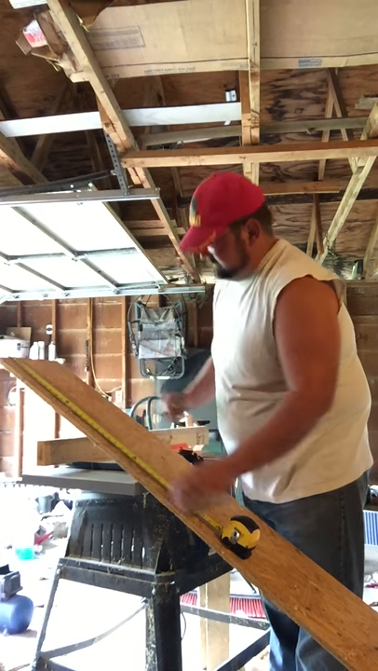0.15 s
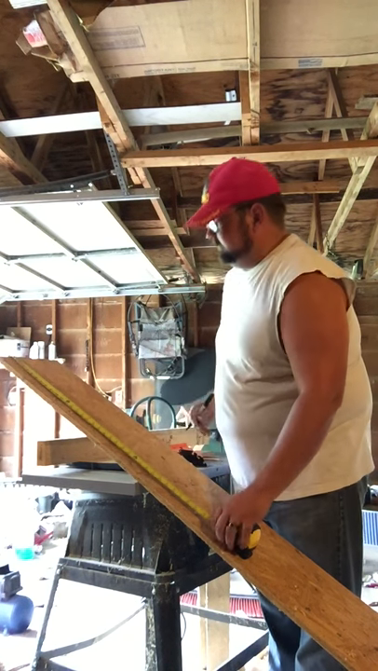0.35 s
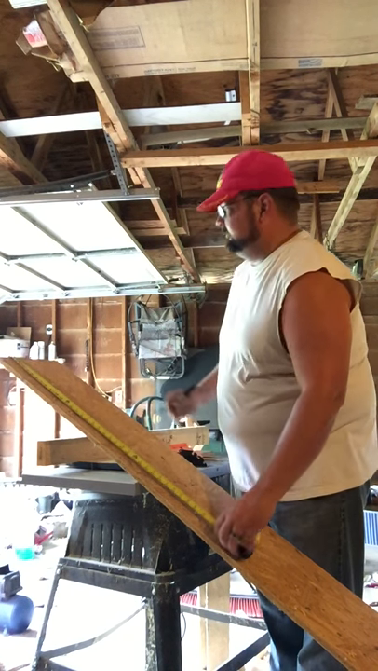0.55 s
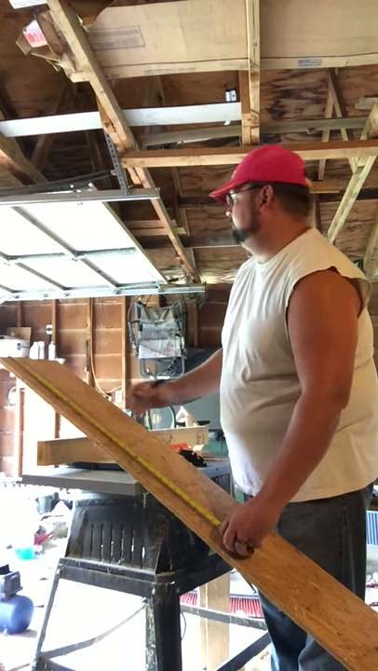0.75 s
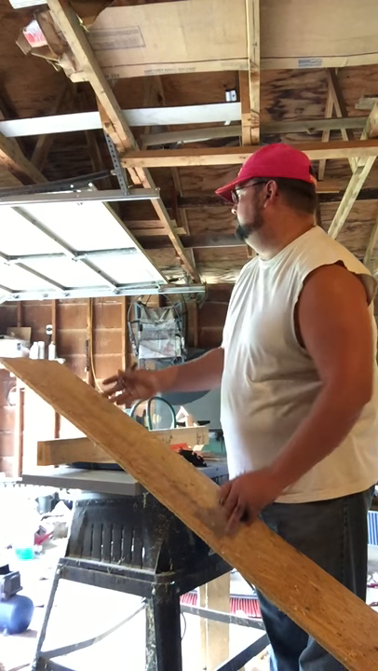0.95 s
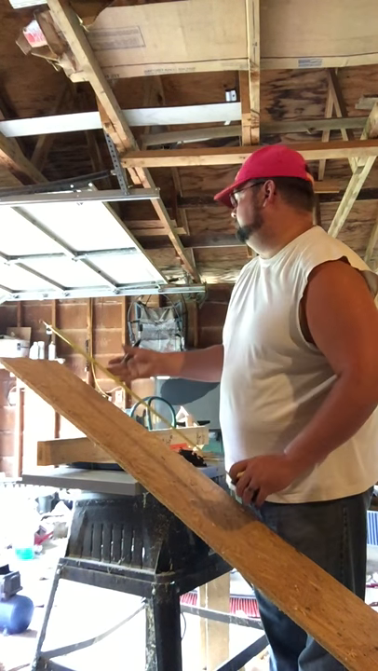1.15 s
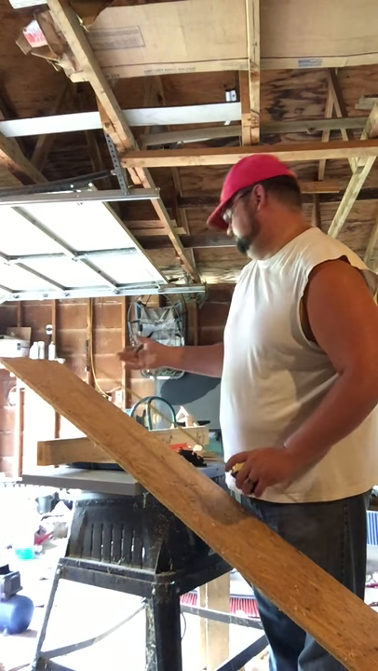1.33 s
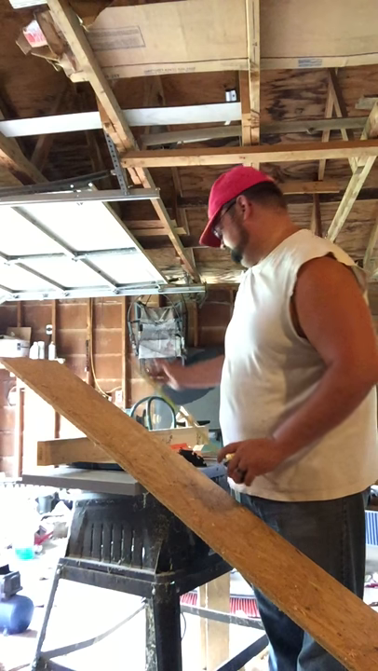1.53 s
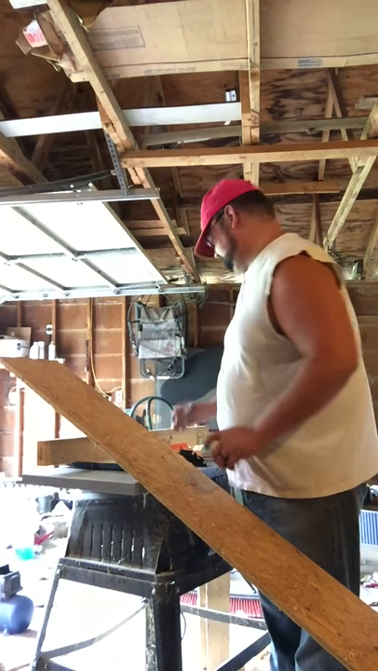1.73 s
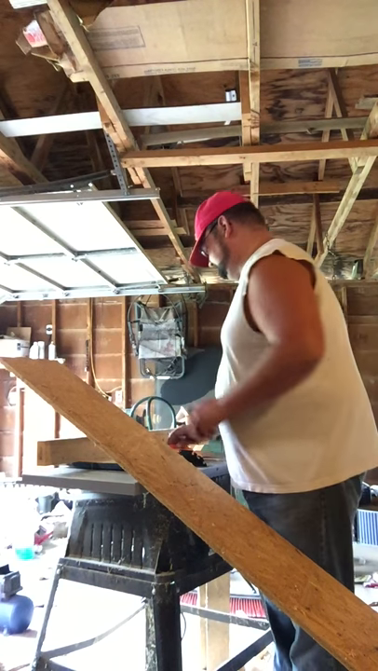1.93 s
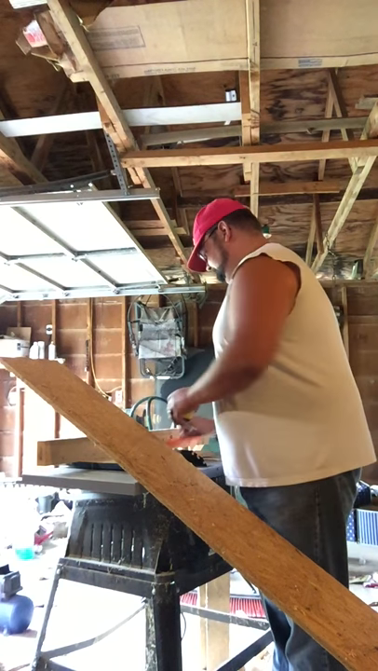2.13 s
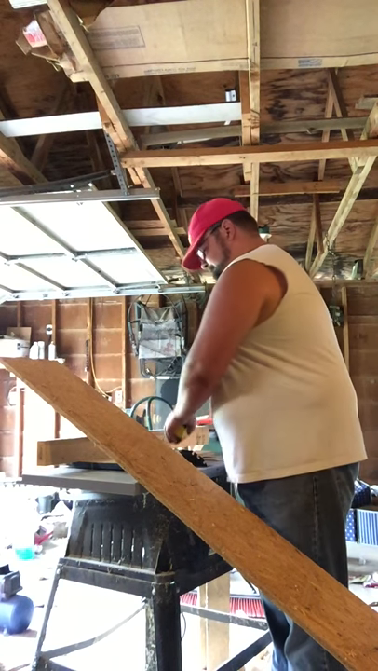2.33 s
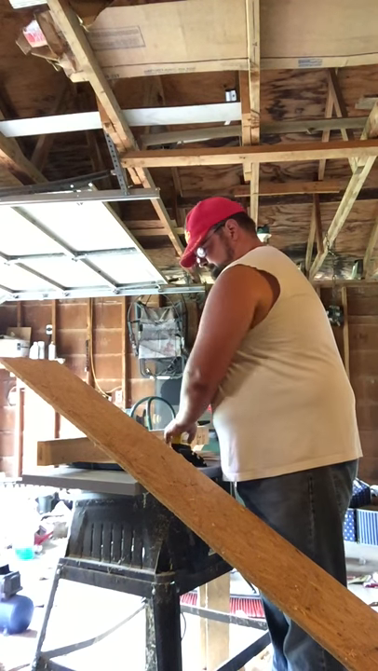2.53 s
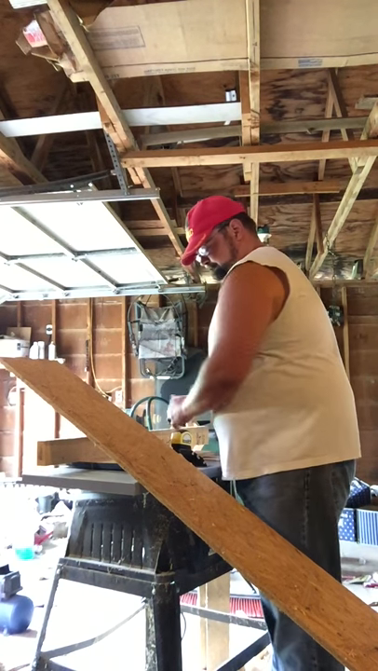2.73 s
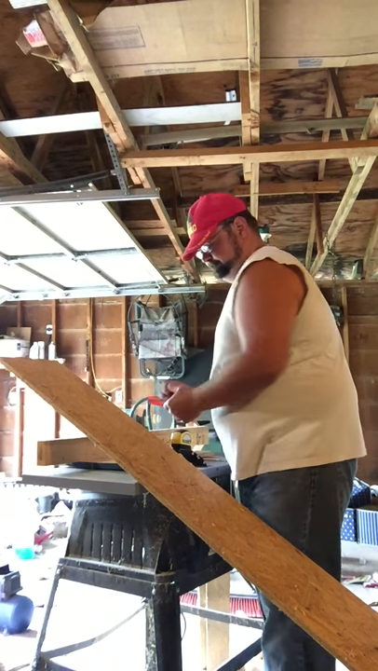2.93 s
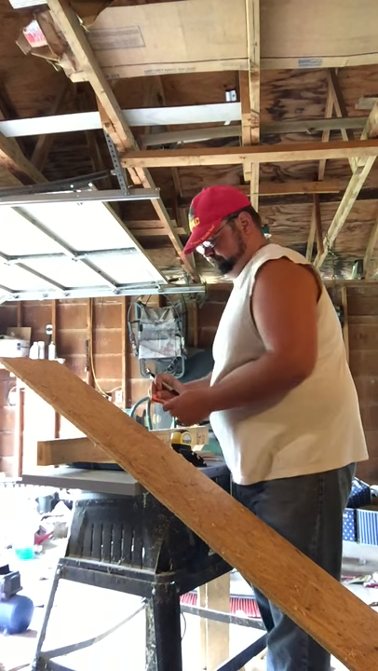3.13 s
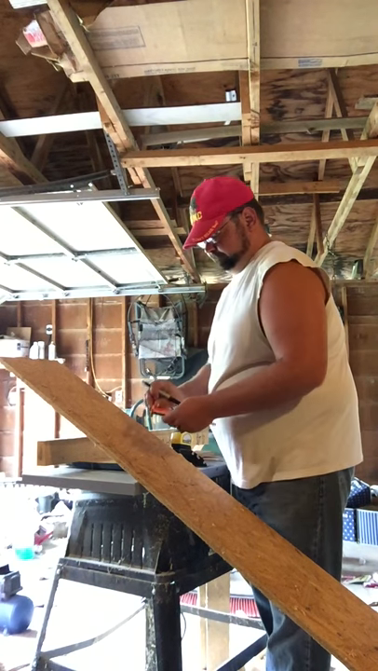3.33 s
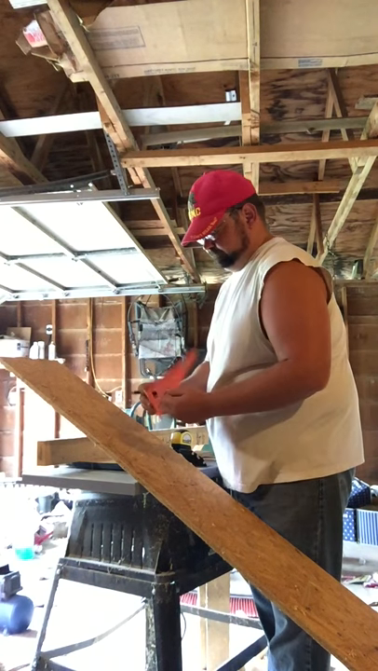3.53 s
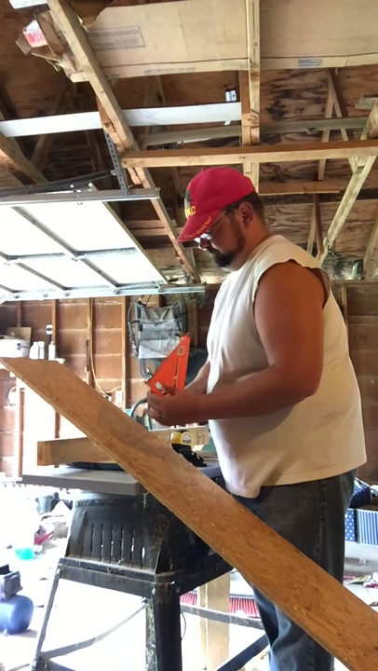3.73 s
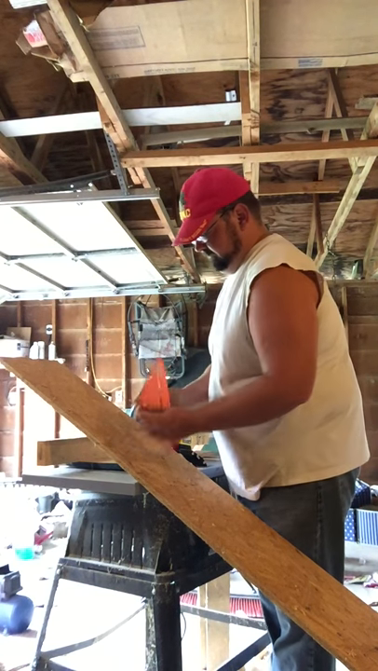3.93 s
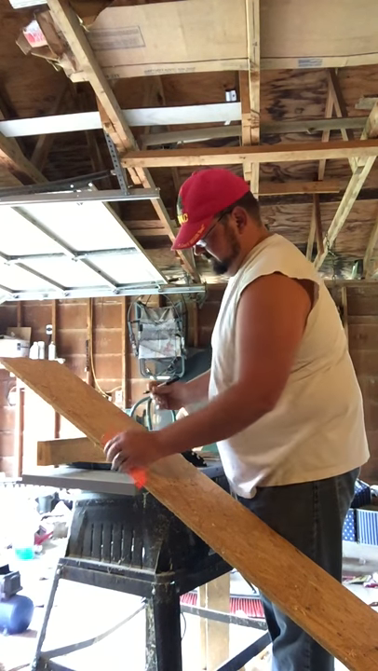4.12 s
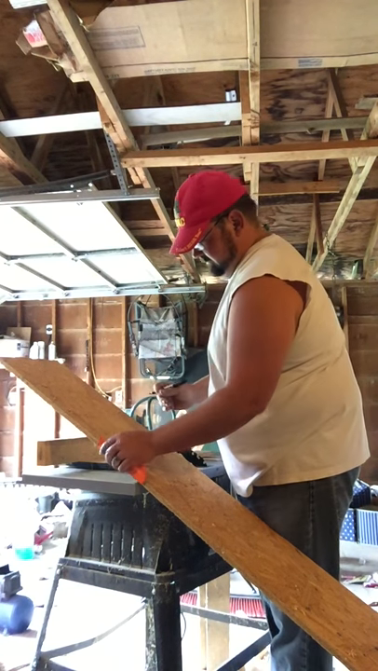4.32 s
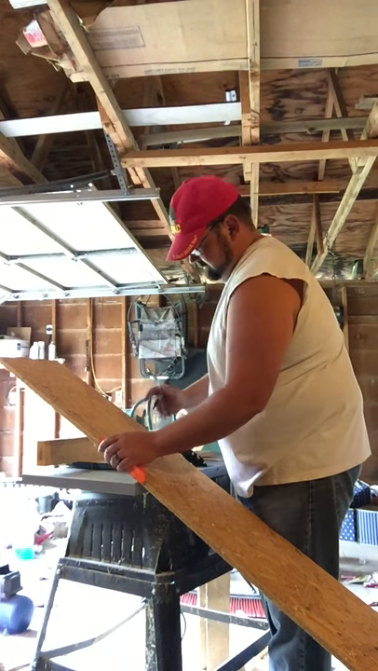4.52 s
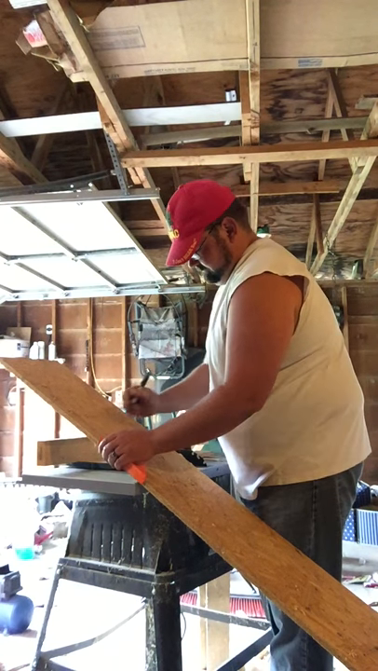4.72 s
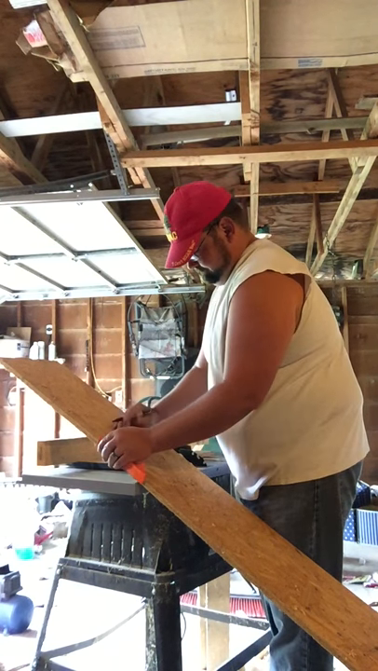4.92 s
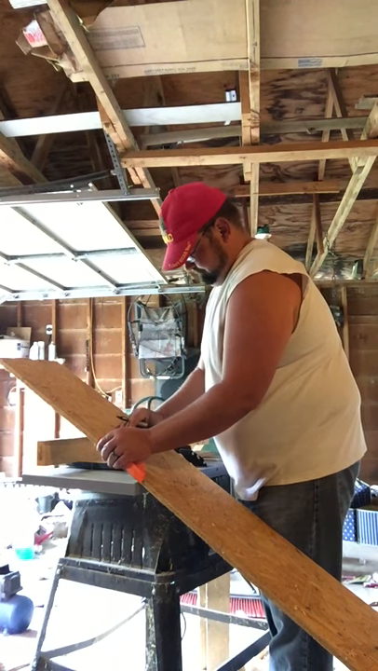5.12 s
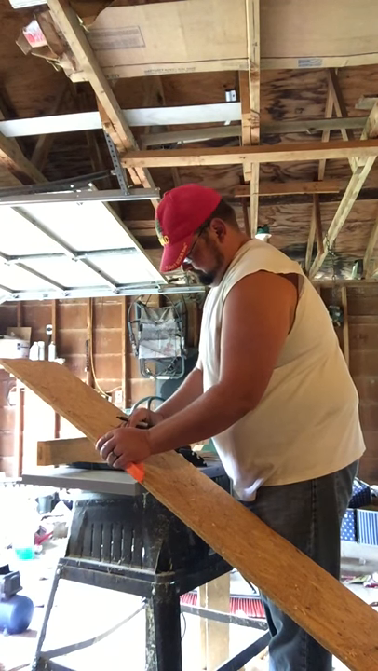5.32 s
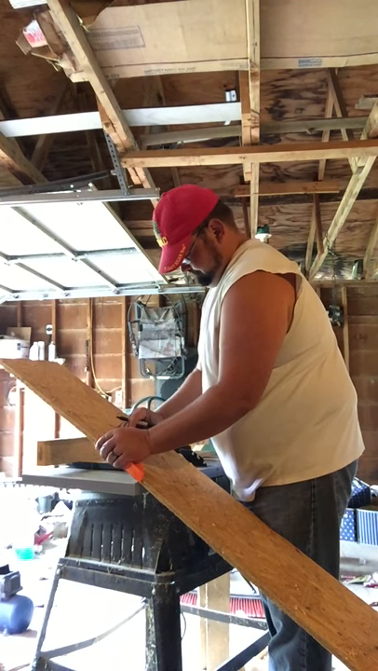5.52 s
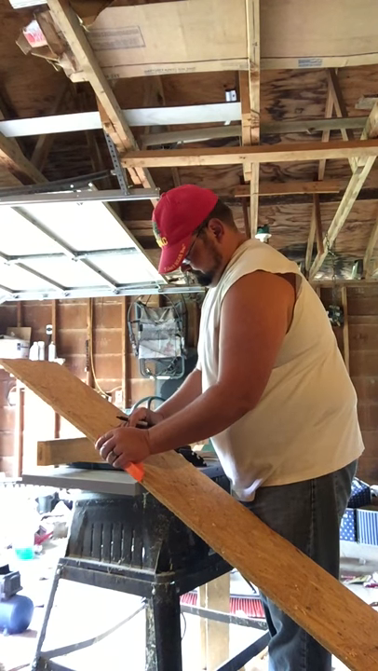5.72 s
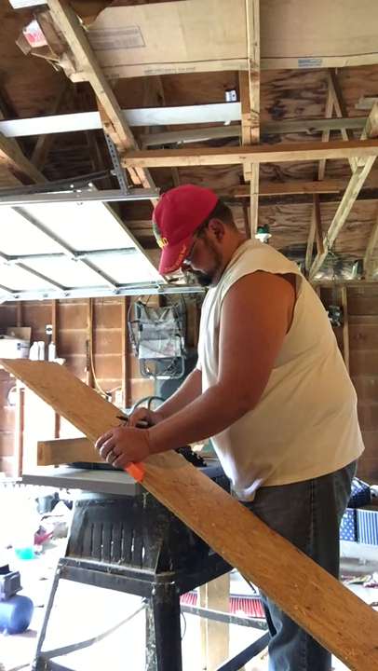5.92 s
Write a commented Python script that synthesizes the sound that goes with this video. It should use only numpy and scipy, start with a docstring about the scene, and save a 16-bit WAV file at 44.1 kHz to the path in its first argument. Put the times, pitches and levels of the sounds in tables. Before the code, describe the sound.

In a quiet timber garage, a tape measure's lock clicks and the thin steel blade hisses in, speeding into a rattle that ends with a sharp snap. The case is put down on a saw table with a clack and thump. After a few light finger taps, a plastic square claps against a long board, which rocks briefly. Each sound has a short room echo, over a faint high hiss and low drone.

```python
"""A steel tape measure is unlocked in a timber garage: its spring pulls the blade in faster and faster,
the spool chatters and the hook snaps against the case. The case is put down on a saw table, then a
plastic square is picked up and clapped against a long board. Each knock is a short push that makes an
object ring; each scrape is thousands of tiny slips. Both echo in the room.
Under it all lie a thin high hiss and a faint low drone, like a distant motor."""
import sys
import numpy as np
from scipy import signal
from scipy.fft import rfft, irfft, next_fast_len
from scipy.io import wavfile
from scipy.ndimage import uniform_filter1d, map_coordinates

SR = 44100
rng = np.random.default_rng(int(sys.argv[2]) if len(sys.argv) > 2 else 0)


def dump_mix(stems):
    """Bounce the given channels to the path in sys.argv[1] as a 16-bit WAV at rate SR."""
    frames = np.atleast_2d(stems).T  # one column per channel
    limited = np.clip(frames, -1, 1)  # hard clip at full scale
    pcm = np.round(limited * 32767).astype(np.int16)
    wavfile.write(sys.argv[1], SR, pcm)


N = 267290


def amp(db):
    """Turn decibels into a number to multiply by."""
    return 10 ** (np.asarray(db) / 20)


def unit(x):
    """Scale a sound so that its average strength (rms) is 1."""
    return x / np.sqrt(np.mean(x ** 2) + 1e-20)


def read_curve(points, hz):
    """Read between (frequency, value) points, with the frequencies spaced by octaves."""
    freqs, values = np.transpose(points)
    return np.interp(np.log(hz + 1), np.log(freqs + 1), values)


def wobble(rate):
    """A smooth random curve that passes through `rate` new values a second."""
    values = rng.standard_normal(int(N * rate / SR) + 4)
    return map_coordinates(values, [np.arange(N) * rate / SR])


def swells(rows, rise_db_per_s, fall_db_per_s):
    """Loudness over time: each row rises to its level by its start time, holds it and dies away."""
    t = np.arange(N) / SR
    gain = np.zeros(N)
    for start_s, hold_s, db in rows:
        before = np.maximum(start_s - t, 0)
        after = np.maximum(t - start_s - hold_s, 0)
        gain += amp(db - rise_db_per_s * before - fall_db_per_s * after)
    return gain


def ringing(body, size=16384):
    """How an object rings after one tap. A body is two lists: its broad tone and its ringing peaks."""
    tone, peaks = body
    hz = np.fft.rfftfreq(size, 1 / SR)
    boost = sum((amp(2 * db) - 1) / (1 + (2 * (hz - f) / width) ** 2) for f, width, db in peaks)
    spectrum = amp(read_curve(tone, hz)) * np.sqrt(np.abs(1 + boost))
    # keep this spectrum, but make all the ringing come after the tap
    cepstrum = irfft(np.log(spectrum))
    cepstrum[1:size // 2] *= 2
    cepstrum[size // 2 + 1:] = 0
    ring = irfft(np.exp(rfft(cepstrum)))[:size // 2]
    return ring / np.linalg.norm(ring)


# How long the room's echo lasts: f/Hz, time to fade by 60 dB/s
ECHO_TIMES = [(100, 0.43), (300, .53), (700, 0.39), (1500, .38), (3000, 0.32), (6000, 0.34), (13000, .22)]

def garage(x, echo_db, early_db=-7, early_s=.014, build_s=.009):
    """Add quick echoes off the bench, then a tail from the rafters whose high notes die sooner."""
    hz, times, noise = signal.stft(rng.standard_normal(SR * 3 // 4), SR, nperseg=256)
    fade = amp(-60 * times / read_curve(ECHO_TIMES, hz)[:, None])
    tail = signal.istft(noise * fade, SR, nperseg=256)[1]
    t = np.arange(len(tail)) / SR
    tail *= 1 - np.exp(-(t / build_s) ** 2)
    early = rng.standard_normal(len(t)) ** 3 * t * np.exp(-(2 * t / early_s) ** 2)
    echoes = amp(echo_db) * tail / np.linalg.norm(tail) + amp(early_db) * early / np.linalg.norm(early)
    echoes[0] = 1  # the sound that arrives directly
    return signal.fftconvolve(x, echoes)


def knocks(rows, body, push_db, buzz_s, echo_db):
    """Each knock is a push and a brief buzz of the touching faces, ringing in the object and the room."""
    out = np.zeros(N + 2 * SR)
    ring = ringing(body)
    t = np.arange(SR // 20) / SR
    fade = amp(-60 * t / buzz_s)
    for start_s, db, cutoff_hz in rows:
        buzz = rfft(rng.standard_normal(len(t)) * fade)
        force = irfft(buzz / np.abs(buzz), len(t)) * np.sqrt(fade)  # reaches all pitches evenly
        force[0] += amp(push_db)
        # a soft knock has a low cutoff and sounds dull; a hard one has a high cutoff
        force = signal.lfilter([1], [1, -np.exp(-2 * np.pi * cutoff_hz / SR)], force)
        hit = signal.fftconvolve(force, ring)
        hit *= np.sqrt(SR / 200 / np.sum(hit ** 2))  # as much energy as 5 ms at strength 1
        hit = garage(hit, echo_db)
        out[round(start_s * SR):][:len(hit)] += amp(db) * hit
    return out[:N]


def moving_contact(x, depth_db):
    """As the point of touch moves, it brings out different pitches at random."""
    spectrum = signal.stft(x, nperseg=1024)[2]
    patches = uniform_filter1d(rng.standard_normal(spectrum.shape), size=7, axis=0)  # smooth in pitch
    patches = uniform_filter1d(patches, size=4, axis=1)  # and in time
    return signal.istft(spectrum * amp(depth_db * unit(patches)), nperseg=1024)[1][:N]


def rub(gain, body, slips_per_s, surge_db, echo_db, patchy_db=3):
    """Rubbing is many tiny random slips, in uneven surges, ringing in the object and the room."""
    slips = (rng.random(N) < slips_per_s / SR) * rng.uniform(-0.75, 1, N)
    slips *= amp(surge_db * wobble(70))
    rung = signal.fftconvolve(slips, ringing(body))[:N]
    scrape = unit(moving_contact(rung, patchy_db))
    return garage(scrape * gain, echo_db)[:N] / np.hypot(1, amp(echo_db))


# Broad tone of the still air: f/Hz, level/dB
AIR_TONE = [(20, -22), (42, -1.5), (100, 2.5), (260, -3), (500, -11), (1400, -10.5), (2500, -12.5),
            (4700, -19), (5050, -23.5), (7400, -21), (9500, -26), (10400, -30.5), (11500, -25),
            (16000, -30.5)]
# Bands of high hiss that stand out of it: f/Hz, width/Hz, height/dB
HISS_PEAKS = [(6020, 430, 12.5), (7350, 490, 16.5)]

def still_air(level_db=-66.5):
    """Soft steady noise with a thin high hiss."""
    noise = signal.fftconvolve(rng.standard_normal(N + SR), ringing((AIR_TONE, HISS_PEAKS)))
    return amp(level_db) * unit(noise[SR:SR + N])


def hum(hz, waver_hz, flutter_db):
    """One tone whose pitch and loudness waver."""
    phase = 2 * np.pi * np.cumsum(hz + waver_hz * wobble(31)) / SR
    return unit(np.sin(phase) * amp(flutter_db * wobble(18)))


# When the drone's lower and upper tones swell: t/s, hold/s, level/dB
LOW_HUM_SWELL = [(5.95, .2, -63)]
UPPER_HUM_SWELL = [(4.15, 0.8, -71.5)]

def far_drone(low_rest_db=-77.5, upper_rest_db=-87):
    """Two faint low tones, like a distant motor, that swell late in the scene."""
    low_gain = np.hypot(amp(low_rest_db), swells(LOW_HUM_SWELL, rise_db_per_s=26, fall_db_per_s=27))
    upper_swell = swells(UPPER_HUM_SWELL, rise_db_per_s=19, fall_db_per_s=20.5)
    upper_gain = np.hypot(amp(upper_rest_db), upper_swell)
    low = low_gain * hum(hz=93, waver_hz=2.6, flutter_db=3)
    upper = upper_gain * hum(hz=161.5, waver_hz=0.68, flutter_db=2)
    return low + upper


# Light taps of fingers and tools, and at 2.594 s the saw table rings once more after the case lands: t/s,
# level/dB, cutoff/Hz, ringing pitch/Hz
LIGHT_TAPS = [(2.297, -63, 2990, 2296), (2.594, -33.5, 201, 986), (3.113, -57, 400, 1374),
              (3.59, -60, 3000, 2280), (3.676, -63, 3000, 2280), (3.872, -62, 16000, 12600),
              (3.884, -61, 1500, 1530), (4.103, -57.5, 5900, 1960)]
# Broad tone that these taps share: f/Hz, level/dB
TAP_TONE = [(25, -44), (200, -16.5), (480, -6), (800, -9.5), (1500, -6), (2300, -4), (3500, -9.5),
            (5500, -13.5), (9000, -26), (13000, -15.5)]

def light_taps():
    """Fingers and tools touch lightly, and the saw table rings once more after the case; each tap rings at its
    own pitch."""
    out = np.zeros(N)
    for start_s, db, cutoff_hz, ring_hz in LIGHT_TAPS:
        body = (TAP_TONE, [(ring_hz, ring_hz / 25, 14)])  # one narrow peak, 14 dB high
        out += knocks([(start_s, db, cutoff_hz)], body, push_db=-20, buzz_s=0.027, echo_db=-2.5)
    return out


# Hand and case slide over the wood: t/s, hold/s, level/dB
WOOD_SLIDES = [(.41, 0.045, -64), (.81, 0.013, -60.5), (.93, .035, -60)]
# Rubbed wood: tone (f/Hz, level/dB) and peaks (f/Hz, width/Hz, height/dB)
WOOD_RING = ([(25, -9), (110, 4.5), (300, -3), (600, -9), (1200, -9), (2200, -4), (5000, -13.5),
             (12000, -28.5)], [(163, 36, 2.2), (1880, 160, 3.3)])

def wood_slide():
    """The hand and the tape's case rub softly over the wood."""
    gain = swells(WOOD_SLIDES, rise_db_per_s=220, fall_db_per_s=145)
    return rub(gain, WOOD_RING, slips_per_s=6200, surge_db=2, echo_db=-4.5)


# The square is laid on and the board rocks: t/s, level/dB, cutoff/Hz
SQUARE_KNOCKS = [(4.2132, -22.5, 5500), (4.2165, -30, 2500), (4.2275, -34.5, 3500), (4.2855, -34.5, 2500),
                 (4.397, -37, 2960)]
BOARD_KNOCKS = [(4.215, -34.5, 1500), (4.283, -28, 1500), (4.293, -30.5, 1790), (4.299, -32.5, 1170),
                (4.317, -35, 250), (4.335, -36.5, 250), (4.399, -35.5, 1520), (4.44, -44, 910)]
# The square's lip skids along the board's edge: t/s, hold/s, level/dB
LIP_SKIDS = [(4.355, 0.0085, -47.5)]
# Square, board and lip: tone (f/Hz, level/dB) and peaks (f/Hz, width/Hz, height/dB)
SQUARE_RING = ([(25, -39), (100, -29), (220, -36), (400, -10.5), (900, -15.5), (1200, -6.5), (1950, -17.5),
               (3000, -8.5), (4000, -7.5), (5200, -14), (8000, -14.5), (11000, -26.5), (15000, -33.5)],
               [(1092, 30, 17.4), (1120, 29, 9.4), (1600, 39, 14), (1663, 59, 24), (2280, 120, 17.7),
               (2931, 78, 11.2), (3600, 210, 9), (4060, 50, 6.3)])
BOARD_RING = ([(25, -65), (70, -33), (115, -18.5), (170, -20), (240, -6.5), (350, -3.5), (600, -9),
              (1300, -11.5), (2500, -11.5), (5000, -45), (12000, -44.5)], [(314, 8.2, 7.1),
              (376.7, 8.8, 8.7), (515.5, 20, 12.5), (688, 13, 10.7), (858, 14, 5.4), (1207, 71, 7.4),
              (1680, 13, 4.6)])
LIP_RING = ([(25, -43), (1000, -1), (3000, 0.5), (6000, -1.5), (8500, -1), (11000, -11.5), (16000, -15)],
            [(7800, 490, 2.2)])

def square_on_board():
    """The plastic square claps on the board and skids into place; the board rocks on its support."""
    clap = knocks(SQUARE_KNOCKS, SQUARE_RING, push_db=-11.5, buzz_s=0.0263, echo_db=-6.5)
    thud = knocks(BOARD_KNOCKS, BOARD_RING, push_db=-19.5, buzz_s=0.062, echo_db=-1)
    skid_gain = swells(LIP_SKIDS, rise_db_per_s=1800, fall_db_per_s=430)
    skid = rub(skid_gain, LIP_RING, slips_per_s=6000, surge_db=0.5, echo_db=-8)
    return clap + thud + skid


# The case lands and the saw table takes its weight: t/s, level/dB, cutoff/Hz
CASE_KNOCKS = [(2.519, -36, 1400), (2.5237, -27.5, 1712), (2.5355, -19.5, 3488)]
TABLE_KNOCKS = [(2.5372, -20.5, 2513), (2.5435, -25.5, 1500)]
# Case and table: tone (f/Hz, level/dB) and peaks (f/Hz, width/Hz, height/dB)
CASE_RING = ([(25, -44.5), (100, -20.5), (500, -12), (1000, -7), (1550, -6), (2200, -3), (3000, -8.5),
             (4400, -13.5), (5200, -18.5), (9000, -25.5), (15000, -31.5)], [(1310, 70, 10), (1556, 90, 4.8),
             (1740, 45, 3.9), (2058, 280, 6), (2500, 26, 5), (3000, 90, 2.9)])
TABLE_RING = ([(25, -50), (85, -30), (130, -7.5), (200, -5), (280, -16), (450, -3), (700, -5), (900, -1.5),
              (1300, -5.5), (3000, -20), (9000, -33)], [(134, 17, 5.1), (190, 4.7, 4.8), (207.7, 18, 7),
              (494.3, 13, 6.5), (710, 42, 11), (907, 25, 5.3), (993, 30, 7.1)])

def case_on_table():
    """The case touches with one edge, then falls flat and thumps the table."""
    clack = knocks(CASE_KNOCKS, CASE_RING, push_db=-18.5, buzz_s=0.064, echo_db=-5)
    thump = knocks(TABLE_KNOCKS, TABLE_RING, push_db=-13, buzz_s=.03, echo_db=-5)
    return clack + thump


# Squeezes of the hand: t/s, hold/s, level/dB
GRIP_CREAKS = [(2.075, 0.017, -52), (2.15, .03, -56)]
# The gripped case: tone (f/Hz, level/dB) and peaks (f/Hz, width/Hz, height/dB)
GRIP_RING = ([(25, -23.5), (80, -15), (200, -0.5), (450, -9), (850, -0.5), (1600, -8.5), (3300, -11.5),
             (5000, -18.5), (12000, -31)], [(891, 83, 6.7), (1020, 60, 5), (2250, 58, 17),
             (3330, 150, 3.3)])

def grip_creak():
    """The case creaks as the hand closes on it."""
    gain = swells(GRIP_CREAKS, rise_db_per_s=600, fall_db_per_s=254)
    return rub(gain, GRIP_RING, slips_per_s=7500, surge_db=3.5, echo_db=-12)


# Clicks of the thumb lock: t/s, level/dB, cutoff/Hz
LOCK_CLICKS = [(1.1215, -52, 7000), (1.1250, -28.5, 8940), (1.1285, -38.5, 5000), (1.134, -39, 5985)]
# The lock: tone (f/Hz, level/dB) and peaks (f/Hz, width/Hz, height/dB)
LOCK_RING = ([(25, -39), (120, -19), (230, -8), (500, -13.5), (1000, -1), (1650, -4.5), (1900, -14),
             (2500, -4.5), (4000, -4.5), (5000, -11.5), (7500, -11), (10500, -23.5), (14000, -16)],
             [(924, 50, 6.5), (1300, 50, 10.5), (1600, 90, 11), (2588, 36, 13), (3976, 170, 5.5)])

def thumb_lock():
    """The lock lets go of the blade with a quick cluster of hard clicks."""
    return knocks(LOCK_CLICKS, LOCK_RING, push_db=-8.5, buzz_s=0.075, echo_db=-7.5)


# The blade scrapes: t/s, hold/s, level/dB
BLADE_SCRAPES = [(.814, 0.038, -52.5), (.912, .11, -54.5), (1.295, .02, -53), (1.348, 0.079, -52)]
# The blade slaps: t/s, level/dB, cutoff/Hz
BLADE_SLAPS = [(.811, -51.5, 12000), (.951, -50.5, 12000), (1.351, -51, 5050), (1.738, -47, 8890),
               (1.744, -43.5, 12000), (1.812, -44, 11930), (1.817, -39, 12000)]
# The thin steel blade: tone (f/Hz, level/dB) and peaks (f/Hz, width/Hz, height/dB)
BLADE_RING = ([(25, -29), (100, -22.5), (400, -12), (800, -19), (1400, -12), (2200, -5), (4000, 1),
              (7000, 4.5), (9000, -1.5), (10500, -4.5), (12500, -3), (16000, -5)], [(1880, 60, 5),
              (2260, 110, 13), (2650, 55, 7.5), (3630, 82, 7), (4430, 140, 5), (4430, 36, 3.7),
              (6440, 120, 3.97), (9040, 200, 6.6), (11800, 570, 3)])

def loose_blade():
    """The thin blade drags along the board and flaps against the board and the case."""
    scrape_gain = swells(BLADE_SCRAPES, rise_db_per_s=2400, fall_db_per_s=400)
    scrape = rub(scrape_gain, BLADE_RING, slips_per_s=3500, surge_db=2.5, echo_db=-13)
    slaps = knocks(BLADE_SLAPS, BLADE_RING, push_db=-17, buzz_s=0.045, echo_db=-1.5)
    return scrape + slaps


# The hook slams into the case and bounces: t/s, level/dB, cutoff/Hz
HOOK_KNOCKS = [(1.8635, -37, 8010), (1.8675, -20.5, 11020), (1.8692, -19, 6063), (1.8704, -13.5, 3012),
               (1.8775, -22.5, 5000), (1.8825, -23.5, 5003)]
# The whole tape measure: tone (f/Hz, level/dB) and peaks (f/Hz, width/Hz, height/dB)
TAPE_RING = ([(40, -31), (150, -33), (240, -20), (400, -21), (600, -27), (900, -12.5), (1500, -12.5),
             (2400, -3.5), (3400, -2.5), (4800, -10), (7000, -7.5), (10000, -11.5), (15000, -13.5)],
             [(1350, 38, 8.6), (1778, 40, 7), (1883, 45, 11), (2337, 38, 9.5), (2425, 38, 11),
             (2490, 40, 5.3), (2940, 60, 2.3), (3110, 30, 5.5), (3520, 40, 4.1), (4310, 92, 8.1),
             (4430, 30, 3.5), (4660, 36, 5), (5178, 40, 4.3), (5350, 40, 4.5), (6406, 61, 7.9),
             (8025, 30, 6.1)])

def tape_rewind(release_s=1, chatter_from_s=1.6, home_s=1.868, hiss_db=-53.5, chatter_db=-35):
    """The spring steadily speeds up the blade: it hisses, the spool chatters, the hook slams home."""
    t = np.arange(N) / SR
    speed = np.clip((t - release_s) / (home_s - release_s), 0, 1) * (t < home_s)
    share_out = 1 - speed ** 2  # how much of the blade is still outside
    hiss_gain = amp(hiss_db) * speed ** .8
    chattering = (t > chatter_from_s) * (t < home_s)
    chatter_gain = amp(chatter_db) * chattering / (1 + share_out / .03)  # half strength with 3% to go
    hiss = rub(hiss_gain, BLADE_RING, slips_per_s=6300, surge_db=3, echo_db=-5)
    chatter = rub(chatter_gain, TAPE_RING, slips_per_s=2200, surge_db=4, echo_db=-2, patchy_db=4.5)
    snap = knocks(HOOK_KNOCKS, TAPE_RING, push_db=-19.5, buzz_s=0.023, echo_db=-5.5)
    return hiss + chatter + snap


def scene():
    """Add up all the sounds at one microphone."""
    background = still_air() + far_drone()
    handling = light_taps() + wood_slide() + square_on_board() + case_on_table()
    tape_measure = grip_creak() + thumb_lock() + loose_blade() + tape_rewind()
    return (background + handling + tape_measure)[None]


def record(dry, top_hz=16000):
    """The microphone loses the deepest bass, and nothing above top_hz is kept."""
    size = next_fast_len(N + SR)
    hz = np.fft.rfftfreq(size, 1 / SR)
    low_cut = amp(read_curve([(15, -22), (25, -11), (45, -0.5)], hz))  # f/Hz, level/dB
    return irfft(rfft(dry, size) * low_cut * (hz < top_hz), size)[:, :N]


dry = scene()
out = record(dry)
dump_mix(out)
```